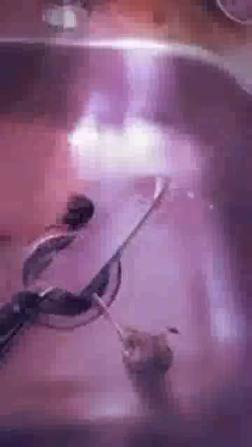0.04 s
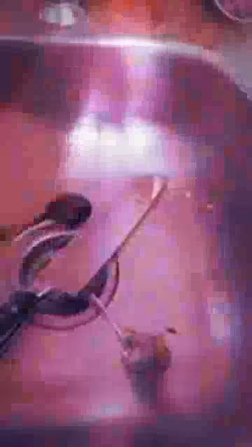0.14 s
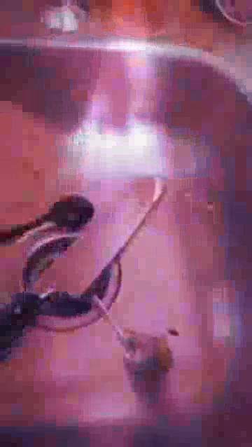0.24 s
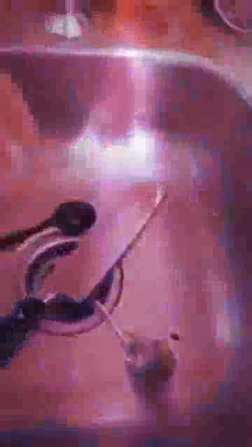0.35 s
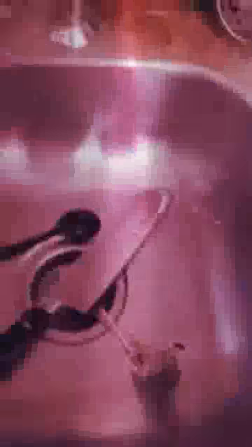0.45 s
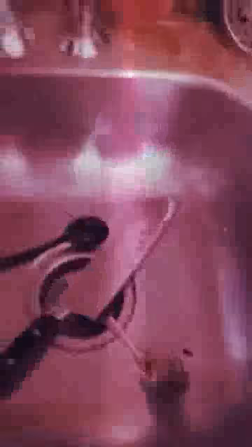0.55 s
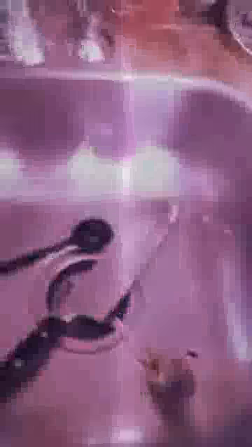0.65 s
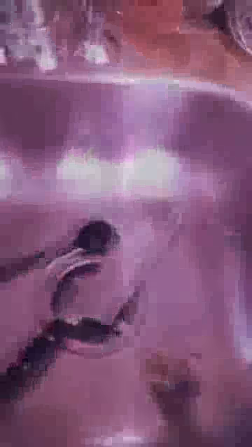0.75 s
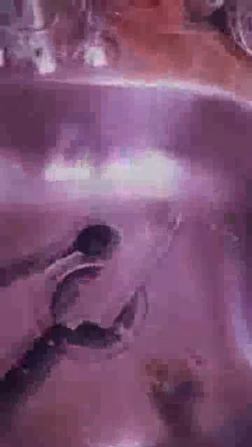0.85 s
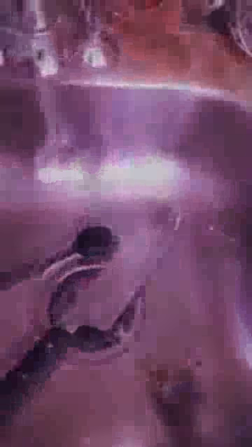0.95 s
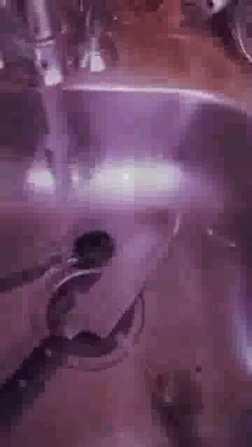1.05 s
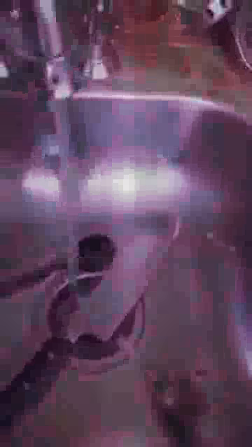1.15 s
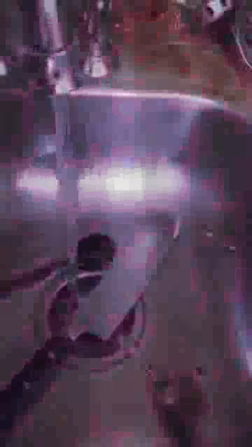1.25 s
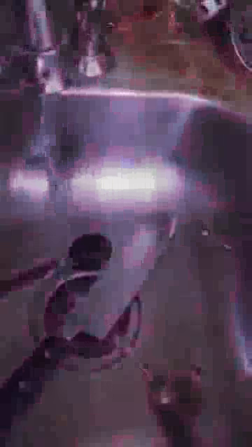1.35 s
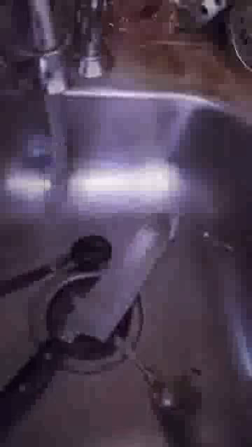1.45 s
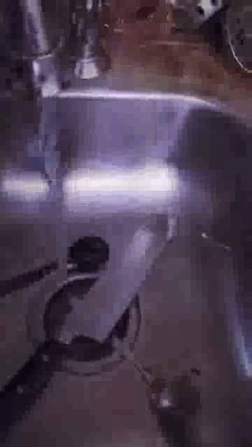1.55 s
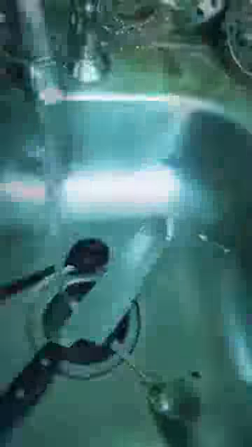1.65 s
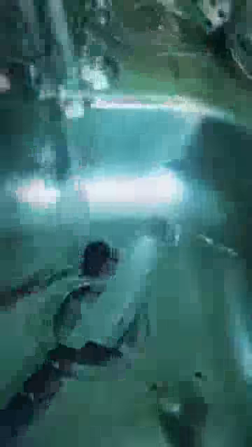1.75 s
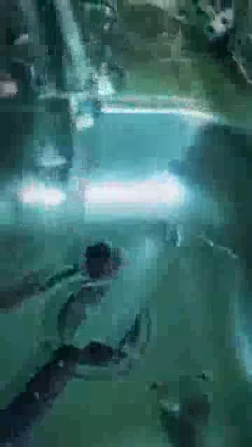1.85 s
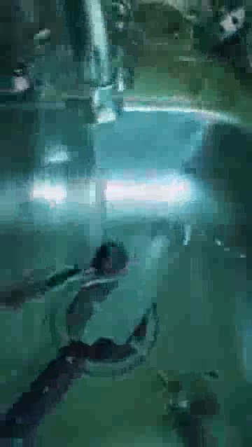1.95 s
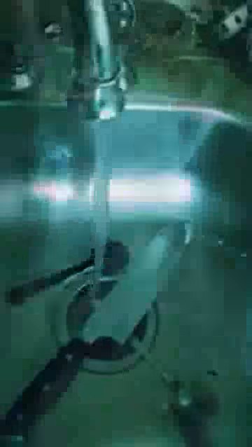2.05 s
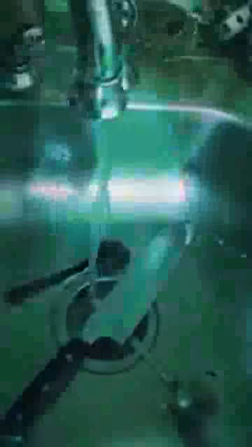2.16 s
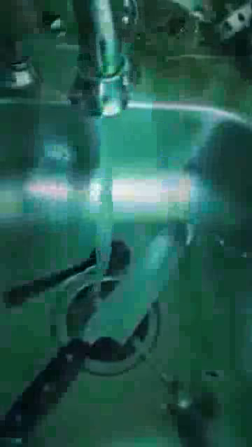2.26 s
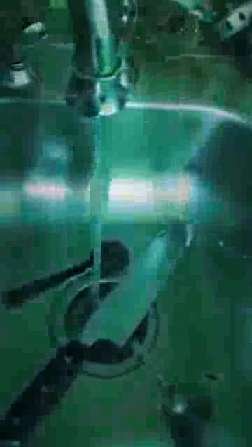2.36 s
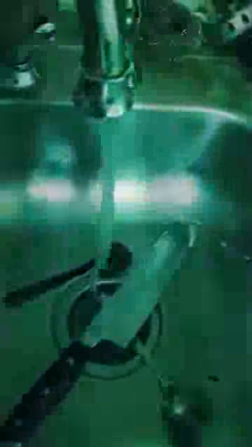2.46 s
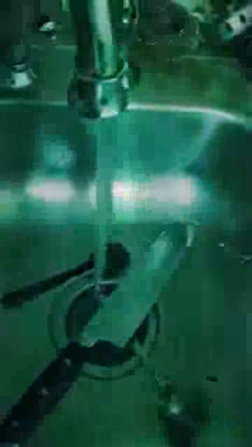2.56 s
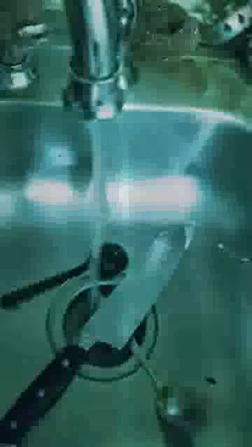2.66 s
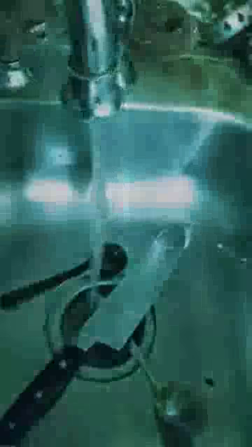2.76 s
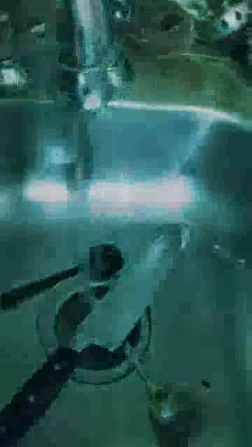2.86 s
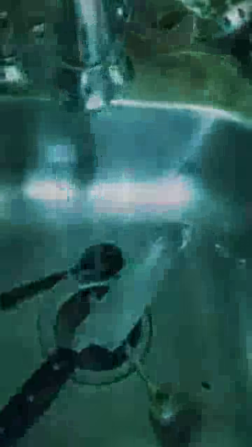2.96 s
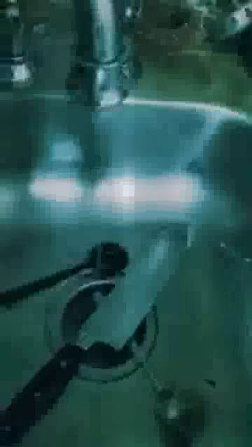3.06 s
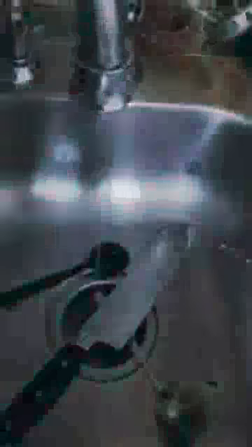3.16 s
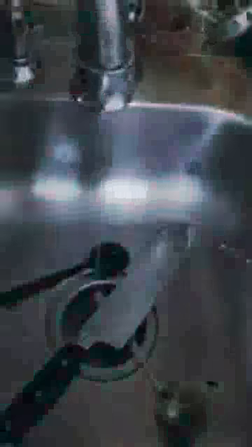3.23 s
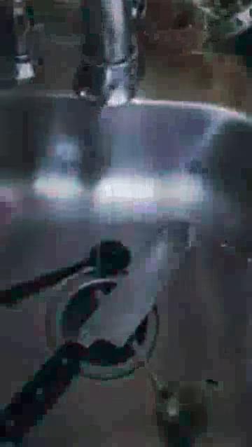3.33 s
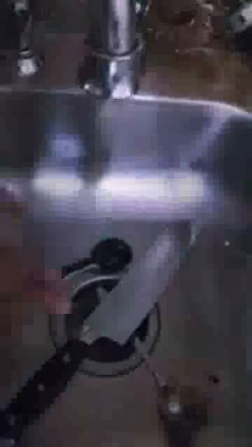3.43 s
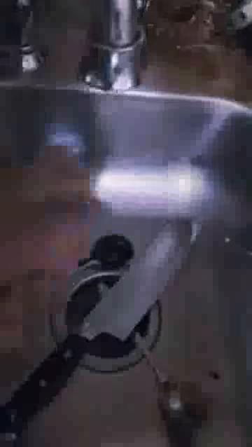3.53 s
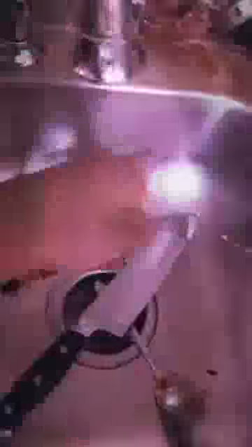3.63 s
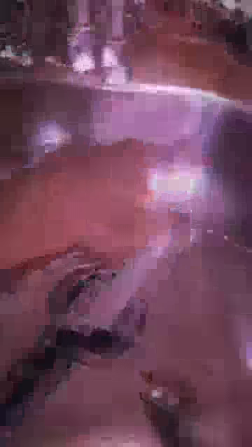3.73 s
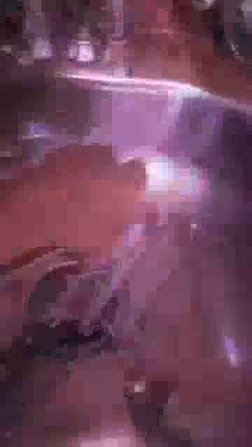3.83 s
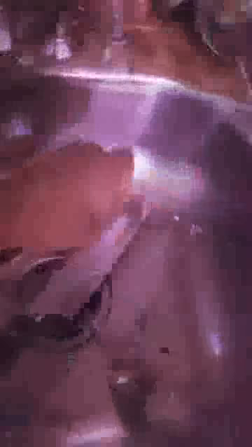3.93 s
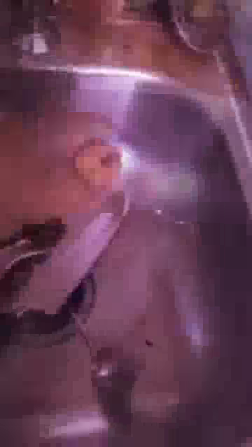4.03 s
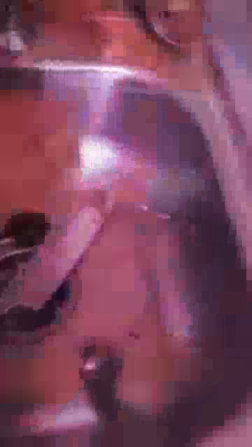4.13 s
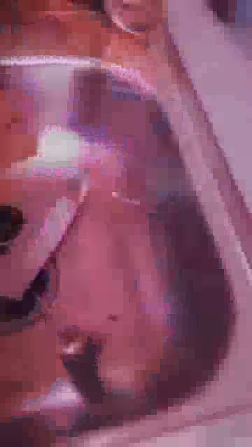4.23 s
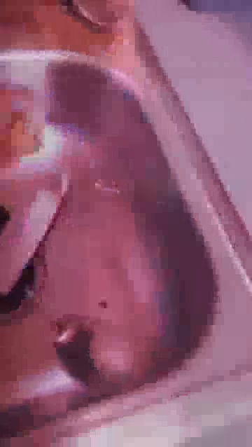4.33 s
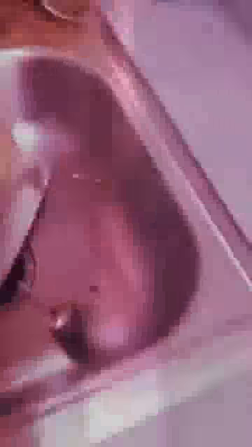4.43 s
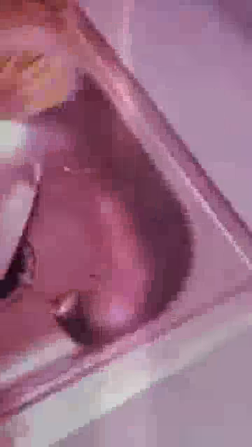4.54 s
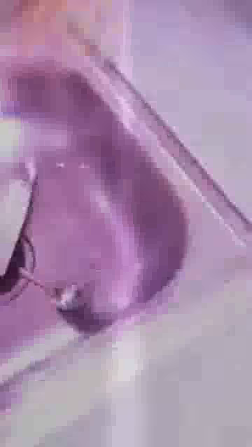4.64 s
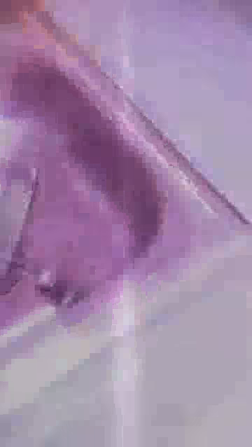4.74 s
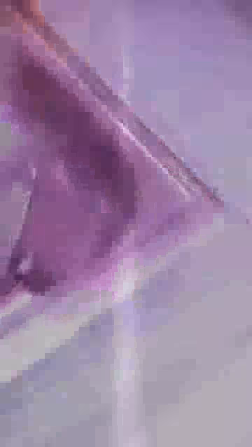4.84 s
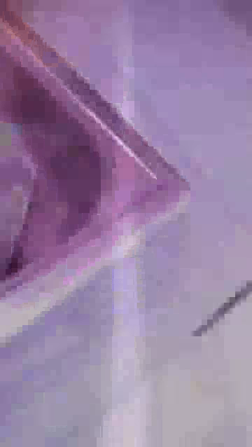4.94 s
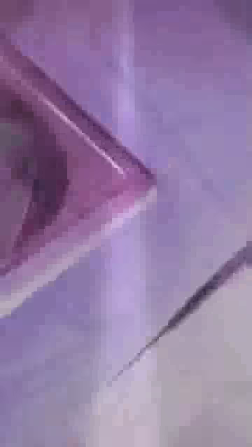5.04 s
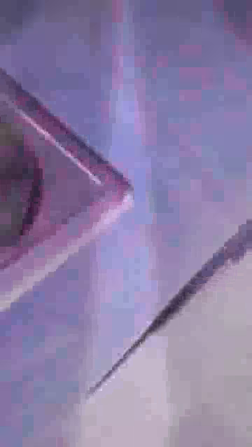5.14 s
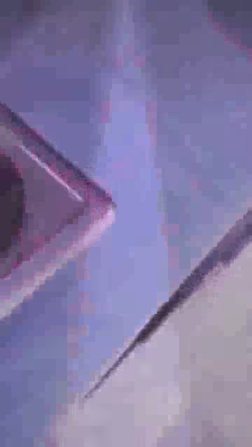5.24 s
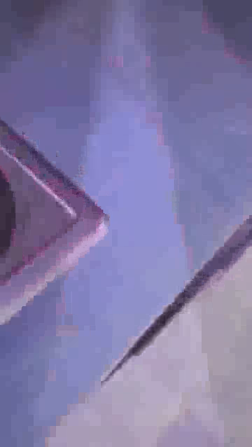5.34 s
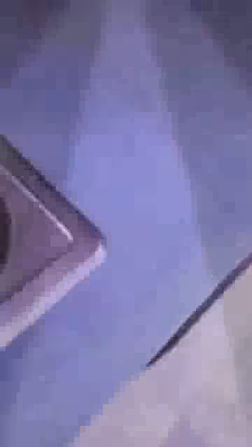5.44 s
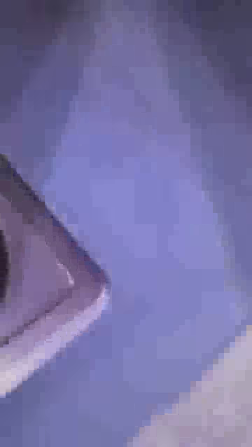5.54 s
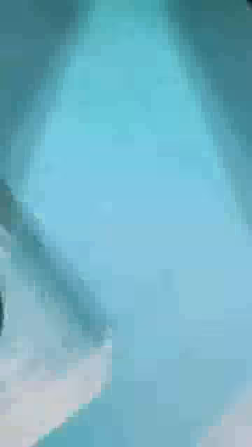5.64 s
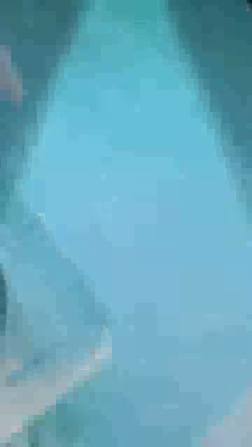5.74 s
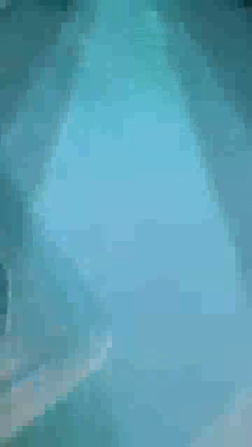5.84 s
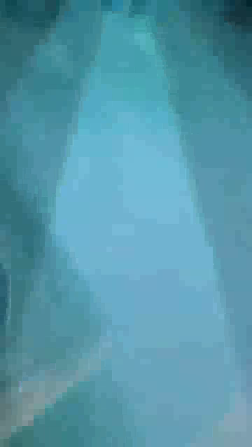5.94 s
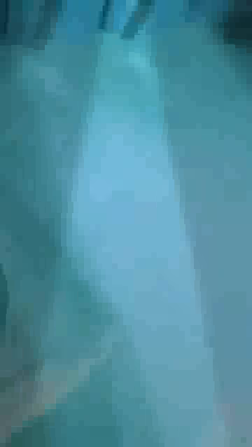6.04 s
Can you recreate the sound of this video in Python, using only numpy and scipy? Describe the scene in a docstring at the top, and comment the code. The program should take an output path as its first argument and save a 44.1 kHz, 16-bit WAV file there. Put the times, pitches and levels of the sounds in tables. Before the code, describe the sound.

A kitchen tap spits open, its stream hisses and drums on a steel sink, hits utensils, shuts off with a knock, drips, then cloth rustles.

```python
"""A kitchen with a stainless steel sink: a tap is opened, spits, and its stream hisses and drums on the basin.
The jet is showers of tiny noise impacts and ringing bubbles; it splatters more as the spout swings over utensils.
It is shut off and the last slugs and drips fall, as noise bursts and damped tones. Knocks and ticks are short noise
bursts, the knocks with ringing modes. Shaped noise makes swishes of clothing and floor rumble as the person steps
away; soft bumps are low damped tones. Sink and room add diffuse echoes."""
import sys
import numpy as np
from scipy import signal
from scipy.fft import rfft, irfft, next_fast_len
from scipy.io import wavfile
from scipy.ndimage import map_coordinates

SR = 44100
rng = np.random.default_rng(int(sys.argv[2]) if len(sys.argv) > 2 else 0)


def wrap_up_sound(samples):
    """Save the sound to the file named by the first command line argument, as 16-bit audio."""
    columns = np.atleast_2d(samples).T
    # keep every value between -1 and 1, then stretch to whole-number steps
    tamed = np.clip(columns, -1, 1)
    steps = np.round(tamed * 32767).astype(np.int16)
    wavfile.write(sys.argv[1], SR, steps)


N = 268569


def amp(db):
    """Decibels to gain."""
    return 10 ** (np.asarray(db) / 20)


def unit(x):
    """Scale to rms 1."""
    return x / np.sqrt(np.mean(x ** 2) + 1e-20)


def peaked(x):
    """Scale to peak 1."""
    return x / np.abs(x).max()


def along(points, hz):
    """Read (Hz, value) points on a log frequency axis."""
    f, v = np.transpose(points)
    return np.interp(np.log(hz + 1), np.log(f + 1), v)


def curve(rows):
    """Join (s, value) rows by straight lines, one value per sample."""
    return np.interp(np.arange(N) / SR, *np.transpose(rows))


def wobble(rate):
    """A smooth random curve with this many knots a second."""
    return map_coordinates(rng.standard_normal(4096), [np.arange(N) * rate / SR], mode="wrap")


def envelope(start, rise, hold, fall_db_per_s):
    """A rounded attack, a hold and an even fall in dB."""
    t = np.arange(N) / SR - start
    attack = np.sin(np.pi / 2 * np.clip(t / rise, 0, 1))
    return attack * amp(-fall_db_per_s * np.maximum(t - rise - hold, 0))


def filtered(x, response):
    """Multiply the spectrum of x by a response of frequency."""
    n = x.shape[-1]
    m = next_fast_len(n + 8192)
    return irfft(rfft(x, m) * response(np.fft.rfftfreq(m, 1 / SR)), m)[..., :n]


def resonance(f, hz, q):
    """A causal band-pass of gain 1 at hz."""
    return 1j * f * hz / q / (hz * hz - f * f + 1j * f * hz / q)


def add(track, s, sound):
    """Mix a sound into the track at s seconds."""
    part = track[:, round(s * SR):][:, :sound.shape[-1]]
    part += sound[..., :part.shape[1]]


# how alike the two ears hear each band: (f/Hz, left-right likeness)
EAR_LIKENESS = [(25, .92), (60, .96), (110, .995), (200, .995), (350, .93), (550, .65), (700, .3),
                (1000, .5), (1300, 0), (16000, -.05)]


def ears(pair):
    """Blend two unrelated signals so that left and right share the bass and part in the treble."""
    turn = lambda hz: np.arccos(np.clip(along(EAR_LIKENESS, hz), -1, 1)) / 2
    mid, side = filtered(pair, lambda hz: np.array([np.cos(turn(hz)), np.sin(turn(hz))]))
    return np.array([mid + side, mid - side])


def coloured(pair, spectrum):
    """Shape two unrelated signals by a spectrum into left and right; rms 1."""
    return unit(ears(filtered(pair, lambda hz: amp(along(spectrum, hz)))))


def leaning(pair, lean):
    """Tilt a pair to the left or right, by frequency."""
    return filtered(pair, lambda hz: amp(np.array([along(lean, hz), -along(lean, hz)]) / 2))


def impacts(spread_db, size=N):
    """Dense tiny impacts whose sizes scatter by spread_db; rms 1."""
    return unit(rng.standard_normal((2, size)) * amp(spread_db * rng.standard_normal(size)))


def echoes(x, t60s, size, count=24):
    """A diffuse noise tail per ear, each frequency dying at its own speed; fresh tails crossfade in turn."""
    out, hop = np.zeros((2, N)), N // count + 1
    padded = np.pad(x, ((0, 0), (hop, 2 * hop)))
    fade = np.hanning(2 * hop)
    for start in range(0, N + hop, hop):
        hz, t, z = signal.stft(rng.standard_normal((2, size)), SR, nperseg=256)
        decay = amp(-60 * t / along(t60s, hz)[:, None])
        tail = signal.istft(z * decay, SR, nperseg=256)[1]
        piece = fade * padded[:, start:start + 2 * hop]
        answer = signal.fftconvolve(piece, tail / np.linalg.norm(tail[0]), axes=1)
        add(out, max(start - hop, 0) / SR, answer[:, max(hop - start, 0):])
    return ears(out)


# colour of the room's steady background: (f/Hz, level/dB)
ROOM_COLOUR = [(25, -24), (60, 1), (100, -1), (150, -20), (260, -18), (400, -10), (700, -12.5), (1200, -27),
               (2000, -24), (2400, -22), (3000, -24), (5000, -30), (16000, -33.5)]


def room_tone():
    """A faint noise floor whose level wavers slightly."""
    level_db = -63.5 + .5 * wobble(26.0)
    return amp(level_db) * coloured(rng.standard_normal((2, N)), ROOM_COLOUR)


# shifts of weight: (t/s, level/dB)
WEIGHT_SHIFTS = [(4.14, -58), (4.37, -53), (4.46, -65), (4.62, -65), (4.96, -54), (5.51, -61), (5.92, -45),
                 (6.02, -60)]
# rumble of the floor: (f/Hz, level/dB)
FLOOR_RUMBLE = [(25, -8), (65, 25.5), (100, -3), (160, 4), (400, -37)]


def steps():
    """Each shift of weight sends a short rumble through the floor."""
    weight = sum(amp(db) * envelope(s, rise=0.03, hold=0.066, fall_db_per_s=102) for s, db in WEIGHT_SHIFTS)
    return weight * coloured(rng.standard_normal((2, N)), FLOOR_RUMBLE)


# soft bumps of pipe, basin floor, hand and feet: (t/s, level/dB, f/Hz, t60/s)
SOFT_BUMPS = [(.085, -51, 600, 0.086), (0.127, -47.5, 148, 0.29), (1.038, -47, 132, 0.03),
              (1.091, -40, 222, 0.021), (1.113, -37.5, 142, 0.081), (1.393, -37, 83, 0.16),
              (1.703, -32.5, 145, 0.23), (1.971, -29.5, 405, 0.096), (2.221, -30, 357, 0.11),
              (2.265, -30.5, 274, 0.17), (2.375, -26, 144.7, 0.32), (2.591, -27.5, 165, 0.11),
              (2.959, -23, 162, 0.06), (3.084, -15, 290, 0.027), (3.13, -18, 352.6, 0.12),
              (3.141, -34, 70.2, 0.45), (3.201, -31.5, 136.2, 0.54), (3.67, -35.5, 179, 0.24),
              (3.884, -41, 191.6, 0.34), (4.285, -45.5, 395, 0.14), (4.966, -44, 70, 0.34),
              (5.389, -49, 207, 0.26), (5.927, -42, 285, 0.041), (5.938, -40, 339, 0.11),
              (5.939, -38.5, 61, 0.14), (5.957, -41.5, 414, 0.095), (5.964, -43.5, 266, 0.073),
              (5.991, -48, 369, 0.19), (6.052, -51, 337, 0.15), (6.06, -35, 62, .5)]


def bumps():
    """Soft low thuds: a damped mode and the scuff of the contact around it."""
    out, t = np.zeros((2, N)), np.arange(SR // 2) / SR
    for s, db, hz, t60 in SOFT_BUMPS:
        fade = amp(-60 * t / t60) * (1 - np.exp(-t / (0.072 * t60)))
        mode = fade * np.sin(2 * np.pi * hz * t)
        scuff = filtered(fade * rng.standard_normal(len(t)), lambda f: resonance(f, hz, q=1.14) ** 2)
        add(out, s, amp(db) * peaked(peaked(mode) + peaked(scuff)))
    return out


# faint rubs with a narrow pitch: (t/s, rise/s, level/dB, f/Hz)
PITCHED_RUBS = [(4.2, 0.16, -65, 2270), (5.03, 0.087, -52, 1390), (5.45, 0.3, -70, 2370)]


def rubs():
    """Something rubs faintly and sings: noise through one narrow band."""
    out = np.zeros((2, N))
    for s, rise, db, hz in PITCHED_RUBS:
        noise = rng.standard_normal((2, N))
        band = unit(ears(filtered(noise, lambda f: resonance(f, hz, q=5.0) ** 2)))
        out += amp(db) * envelope(s, rise, hold=0, fall_db_per_s=130) * band
    return out


# strokes of cloth over cloth: (t/s, rise/s, soft rustle level/dB, crisp swish level/dB)
CLOTH_STROKES = [(0.0, 0.0015, -68, -57), (.03, 0.085, -64, -57), (.2, 0.092, -71.5, -64),
                 (.36, 0.15, -65, -71), (.64, .1, -62, -60.5), (.77, 0.075, -51.5, -53),
                 (4.05, 0.1, -84, -62.5), (4.19, 0.057, -60, -66), (4.33, 0.04, -63.5, -72.5),
                 (4.41, 0.075, -53.5, -55.5), (4.579, 0.043, -54.5, -52), (4.66, 0.054, -59, -62.5),
                 (4.89, 0.088, -52.5, -50), (4.91, 0.26, -49, -46), (5.24, 0.051, -55.5, -55),
                 (5.316, 0.022, -48.5, -40.5), (5.35, 0.037, -48.5, -44.5), (5.489, 0.057, -61.5, -63),
                 (5.703, 0.055, -49.5, -41.5), (5.917, 0.02, -49, -51), (6.02, 0.075, -57.5, -67)]
# soft rustle of the fibres: (f/Hz, level/dB)
RUSTLE_COLOUR = [(150, -8.5), (400, 3.5), (800, 0.5), (1100, 1), (1380, 1.5), (1800, 3), (2400, 4.5),
                 (3200, 2), (5000, -2), (15000, -26)]
# crisp swish on top: (f/Hz, level/dB)
SWISH_COLOUR = [(1000, -15.5), (3000, 5.5), (6000, 4.5), (11000, 4), (16000, 4.5)]


def clothes():
    """Cloth slides over cloth: each stroke is a soft rustle with a crisp swish on top."""
    rustle, swish = np.zeros((2, N))
    for s, rise, rustle_db, swish_db in CLOTH_STROKES:
        speed = envelope(s, rise, hold=0.013, fall_db_per_s=166)
        # overlapping strokes add in power
        rustle = np.hypot(rustle, amp(rustle_db) * speed)
        swish = np.hypot(swish, amp(swish_db) * speed)
    soft = rustle * coloured(impacts(spread_db=2.5), RUSTLE_COLOUR)
    crisp = swish * coloured(impacts(spread_db=2.5), SWISH_COLOUR)
    return soft + crisp


# sharp ticks of tap, utensils, sleeve and shoe heel: (t/s, level/dB, f/Hz, t60/s)
SHARP_TICKS = [(.034, -25, 11850, 0.048), (.215, -46, 6600, 0.048), (0.255, -46, 6300, 0.03),
               (0.318, -42.5, 4660, 0.035), (.631, -40.5, 3730, 0.02), (1.019, -45, 7040, .03),
               (1.092, -37, 8400, 0.05), (2.496, -8, 10000, 0.04), (2.769, -8, 4740, 0.017),
               (3.554, -47, 4100, 0.075), (3.772, -41, 8600, 0.016), (3.858, -39, 3430, 0.051),
               (3.878, -44, 10650, .03), (3.896, -39.5, 8800, 0.027), (4.226, -40, 4860, 0.027),
               (4.234, -40, 11100, 0.036), (4.348, -50, 3140, 0.019), (4.903, -38, 13000, .012),
               (4.903, -45.5, 1700, .012), (5.28, -37, 9200, 0.071), (5.924, -41, 1600, .015),
               (5.926, -37, 3100, 0.01)]


def ticks():
    """A sharp little contact: a crack, then a brief ring of filtered noise."""
    out, t = np.zeros((2, N)), np.arange(4096) / SR
    for s, db, hz, t60 in SHARP_TICKS:
        fade = amp(-60 * t / t60) + amp(-60 * t / 0.0048)
        burst = rng.standard_normal((2, len(t))) * fade
        add(out, s, amp(db) * peaked(filtered(burst, lambda f: resonance(f, hz, q=2.33) ** 2)))
    return out


# knocks on the steel, and one faint bump as a cloth swish starts:
# (t/s, level/dB before the basin, brightness/dB)
KNOCK_BLOWS = [(.356, -48, -3), (0.378, -45, -4), (0.397, -45, 2), (3.124, -5.5, 7), (3.159, -21, 36),
               (4.286, -38, -19), (4.903, -45, -21)]
# bright modes of a knock: (f/Hz, relative level/dB, t60/s before the cap in knocks)
STEEL_MODES = [(1890, 4, 0.093), (2330, -24, 0.056), (2470, 5.5, 0.08), (3262, -38.5, 0.22),
               (4140, -16, 0.052), (4700, -7, 0.04), (6060, -4, 0.02), (6840, -38, 0.0486)]
# hollow plop, in knocks and splats: (f/Hz, level/dB)
PLOP_COLOUR = [(60, -34.5), (180, 2.5), (300, -5.5), (470, 2.5), (600, 4.5), (750, 0.5), (1050, 1.5),
               (1400, -13.5), (3000, -34)]


def knocks():
    """A short hollow thump; its brightness sets how much crack and ringing steel comes with it."""
    out, t = np.zeros((2, N)), np.arange(12000) / SR
    crack_colour = [(900, -38), (2200, 8.0), (4600, -1.5), (16000, -18.0)]  # f/Hz, level/dB
    for s, db, bright_db in KNOCK_BLOWS:
        body = coloured(rng.standard_normal((2, len(t))) * amp(-60 * t / 0.032), PLOP_COLOUR)
        ring = np.zeros((2, len(t)))
        for hz, level_db, t60 in STEEL_MODES:
            fade = amp(level_db - 60 * t / min(t60, .05))  # no mode outlasts a t60 of 50 ms
            ring += fade * np.sin(2 * np.pi * (hz * t + rng.random((2, 1))))
        crack = coloured(rng.standard_normal((2, len(t))) * amp(-60 * t / 0.016), crack_colour)
        bright = .7 * peaked(ring) + peaked(crack)
        add(out, s, amp(db) * peaked(peaked(body) + amp(bright_db) * bright))
    return out


# ringing drops, bubbles and clinks: (t/s, level/dB before trim, f/Hz, t60/s)
DROPS_AND_CLINKS = [(0.032, -29.5, 6300, 0.018), (.213, -44, 3080, .025), (.242, -49, 3000, .025),
                    (.243, -50, 1740, 0.043), (.291, -48, 2970, 0.039), (0.294, -52, 1700, .035),
                    (0.318, -41, 4800, .028), (.321, -55, 2960, 0.038), (0.351, -41.5, 1780, .03),
                    (.355, -37, 1570, 0.03), (.355, -44, 990, 0.034), (.365, -49, 755, 0.099),
                    (0.378, -40, 1010, 0.043), (0.38, -58, 1530, .05), (.386, -49, 450, 0.11),
                    (0.397, -39.5, 1200, 0.037), (.402, -47, 800, 0.045), (.449, -46, 1920, 0.03),
                    (.476, -53, 2980, .03), (.356, -52, 3030, .05), (.401, -52, 3000, .035),
                    (.607, -52, 3030, .02), (.631, -37, 2980, 0.016), (.631, -41, 3640, .016),
                    (1.642, -19.5, 1154, 0.061), (1.656, -22, 1073, 0.074), (1.667, -23, 880, 0.034),
                    (1.964, -15.5, 943, 0.032), (1.966, -24, 2140, 0.016), (1.974, -21, 3180, 0.023),
                    (2.198, -21.5, 904, 0.032), (2.226, -23.5, 941, 0.078), (2.425, -20.5, 950, 0.057),
                    (2.466, -25, 1090, 0.061), (2.538, -24.5, 1023, 0.086), (2.645, -26, 1072, 0.064),
                    (2.69, -18.5, 1860, 0.03), (2.888, -16.5, 3130, 0.043), (2.926, -28, 3150, 0.044),
                    (3.036, -21.5, 1096, 0.18), (3.038, -21, 613, 0.076), (3.124, -10, 2197, 0.043),
                    (3.132, -14.5, 2530, 0.066), (3.158, -13, 2740, 0.033), (3.176, -17.5, 2310, 0.04),
                    (3.195, -18, 2180, 0.033), (3.312, -18, 537, 0.043), (3.414, -24.5, 540, 0.055),
                    (3.476, -32, 2840, 0.026), (3.518, -35.5, 2760, 0.025), (3.553, -19, 3400, 0.019),
                    (3.579, -21.5, 1910, 0.039), (3.588, -24, 824, 0.045), (3.586, -19, 562, 0.076),
                    (3.618, -27, 2240, 0.03), (3.643, -23, 488, 0.033), (3.652, -29, 1000, .03),
                    (3.686, -29, 2010, 0.029), (3.695, -26.5, 836, 0.065), (3.698, -34, 2260, 0.072),
                    (3.709, -35, 646, 0.026), (3.771, -39, 2240, 0.035), (3.788, -34, 2960, 0.03),
                    (3.814, -23.5, 540, 0.05), (3.83, -28, 427, 0.069), (3.807, -38, 1990, 0.028),
                    (3.878, -32, 560, 0.031), (3.976, -32, 600, .04), (3.523, -32, 584, .025),
                    (3.539, -40, 794, .025), (3.6, -27, 746, .035), (3.628, -34.5, 1050, .03),
                    (3.752, -42, 810, 0.025), (3.856, -38, 2920, 0.036), (3.862, -40, 3510, 0.029),
                    (3.897, -38, 2380, .025), (3.921, -37, 969, 0.078), (4.284, -30, 1000, 0.041),
                    (4.286, -39, 630, .04), (4.68, -43, 566, 0.026), (4.372, -54, 420, .08),
                    (4.412, -52, 2240, .05), (4.349, -46, 3170, 0.028), (4.349, -44.5, 960, .035),
                    (4.351, -39, 2250, 0.068)]


def plinks():
    """A damped tone, roughened by the contact that starts it; its phase differs between the ears."""
    out, t = np.zeros((2, N)), np.arange(8192) / SR
    for s, db, hz, t60 in DROPS_AND_CLINKS:
        lag_s = .00005 * rng.standard_normal((2, 1))
        fade = amp(-60 * t / t60) * (1 - np.exp(-t / 0.0012))
        tone = np.sin(2 * np.pi * hz * (t + lag_s)) * fade
        noise = rng.standard_normal((2, len(t))) * amp(-60 * t / 0.026)
        contact = ears(filtered(noise, lambda f: resonance(f, hz, q=3.4) ** 2))
        add(out, s, amp(db - 3) * (tone + .55 * peaked(contact)))
    return out


# short spits as the valve opens, then a longer rush through the spout: (t/s, hold/s, level/dB)
SPITS_AND_RUSH = [(1.002, 0.013, -60.5), (1.009, 0.014, -56), (1.088, 0.013, -58.5), (1.143, 0.44, -55.5)]
# colour of the spout tube: (f/Hz, level/dB)
SPOUT_COLOUR = [(150, -6.5), (400, 13), (1000, 1.5), (1400, -7), (2100, -7), (2500, 0.5), (2900, -41),
                (6000, -20.5), (16000, -23)]


def squirts():
    """Air and water spit, then rush longer through the spout as the valve opens; the tube colours the noise."""
    push = sum(amp(db) * envelope(s, 0.0037, hold, fall_db_per_s=453) for s, hold, db in SPITS_AND_RUSH)
    return push * coloured(impacts(spread_db=0.5), SPOUT_COLOUR)


# slugs of water and wet slaps, before trims: (t/s, level/dB, plop level/dB, splash level/dB)
WATER_SLUGS = [(1.6427, -23.5, -2, -18), (1.6665, -29, 9, 0), (1.714, -44, 5, -11.5), (1.9277, -26, -1, 1),
               (1.963, -24.5, -2.5, -10), (1.98, -35.5, 17.5, 1), (2.125, -34, 13, -3),
               (2.16, -24.5, -4.5, -8), (2.1998, -25.5, 8, -8), (2.226, -42.5, -1, 5.5),
               (2.4187, -21.5, -12.5, 2), (2.5352, -24.5, -4.5, -12.5), (2.5988, -25, -11.5, 6.5),
               (2.835, -29.5, -8.5, 13), (2.9312, -34.5, 3.5, 17.5), (3.0339, -35.5, 21, -19),
               (3.0774, -29, 10.5, -9.5), (3.1561, -10.5, -2.5, -16.5), (3.195, -17, 0, -2),
               (3.2883, -35.5, 1, 15), (3.3119, -29.5, -3.5, -11.5), (3.372, -18.5, -2, -6),
               (3.4071, -25, 5.5, -1), (3.52, -42, 8, 1.5), (3.535, -46.5, 20, -16), (3.583, -24, 4, -15.5),
               (3.596, -27.5, 10.5, -8.5), (3.618, -45.5, -23, -6.5), (3.645, -48.5, 24, -0.5),
               (3.686, -34, 10, -21.5), (3.696, -27, 7, -24), (3.708, -33, 2, -10.5),
               (3.732, -47.5, 10, -6), (3.768, -31, 3.5, -5.5), (3.785, -42, 1, -7.5),
               (3.811, -39.5, 20, -7.5), (3.839, -48, 9.5, -4), (3.877, -40.5, 14, -1), (3.897, -34, 2, -5),
               (3.9184, -50, 19.5, -34), (3.974, -44.5, 10.5, -5)]
# water slapping the utensils: (f/Hz, level/dB)
CLACK_COLOUR = [(900, -31.5), (1400, -20), (1950, 6), (2500, -1), (3000, -4), (4500, -10), (16000, -56)]
# splash of droplets: (f/Hz, level/dB)
SPLASH_COLOUR = [(1800, -12), (2700, 2.5), (3300, 3.5), (4500, 2.5), (6000, 0.5), (8000, -5.5),
                 (16000, -32)]
# fine hiss, in splats and the stream: (f/Hz, level/dB)
SPRAY_COLOUR = [(500, -32.5), (1500, -3), (2600, -9.5), (4200, -10.5), (6200, -3), (7600, -6.5), (9300, -2),
                (12500, -5), (16000, -4)]


def splats():
    """Each slug of water lands as a short burst of droplets: a clack, a plop on the steel, a splash and fizz."""
    out, t = np.zeros((2, N)), np.arange(8192) / SR
    rise_s, length_s = 0.00098, 0.014
    swell = (1 - np.exp(-t / rise_s)) * np.exp(-(t / length_s) ** 1.11)
    burst = lambda spectrum: coloured(swell * impacts(spread_db=6.5, size=len(t)), spectrum)
    for s, db, plop_db, splash_db in WATER_SLUGS:
        droplets = burst(SPLASH_COLOUR) + amp(-4) * burst(SPRAY_COLOUR)
        plop = amp(plop_db - 3.0) * burst(PLOP_COLOUR)
        splash = amp(splash_db + 1.5) * droplets
        add(out, s, amp(db - 24.5) * (burst(CLACK_COLOUR) + plop + splash))
    return out


# the two low bands under the water: (t/s, boom level/dB, drumming level/dB)
LOW_BANDS = [(1.0, -75, -71), (1.04, -50, -59), (1.33, -56.5, -53), (1.42, -48, -42), (1.56, -45.5, -40.5),
             (1.78, -45.5, -45.5), (1.89, -44, -56), (1.99, -50.5, -41.5), (2.1, -40.5, -50.5),
             (2.2, -48.5, -34.5), (2.33, -48.5, -43), (2.42, -49.5, -43.5), (2.92, -47.5, -39),
             (3.1, -39, -38.5), (3.28, -47.5, -41.5), (3.48, -61, -62.5), (3.63, -53, -47),
             (3.92, -54.5, -56), (4.058, -72, -65)]
# the whole basin flexing under the stream: (f/Hz, level/dB)
BOOM_COLOUR = [(25, -12.5), (45, -3.5), (60, 0), (80, 1.5), (105, -1), (135, -20.5), (300, -48)]
# the basin floor drumming: (f/Hz, level/dB)
DRUM_COLOUR = [(90, -21.5), (125, -8.5), (148, -0.5), (185, 6.5), (225, -3.5), (300, -22.5), (600, -29.5)]
# the jet roaring on bare steel: (t/s, hold/s, level/dB)
BARE_STEEL_ROARS = [(1.201, 0.25, -40.5), (1.693, 0.11, -45), (2.003, 0.014, -41)]
# colour of that roar: (f/Hz, level/dB)
ROAR_COLOUR = [(150, -30), (230, -6), (285, -1), (360, -3.5), (440, -1.5), (520, -25), (640, -30),
               (760, -7), (860, -30.5), (990, -7.5), (1200, -22.5), (3000, -40)]


def drumming():
    """The basin booms and drums under the water, and roars where the jet meets bare steel."""
    boom_db = curve([(s, db) for s, db, _ in LOW_BANDS])
    drum_db = curve([(s, db) for s, _, db in LOW_BANDS])
    t = np.arange(N) / SR
    wet = (t > LOW_BANDS[0][0]) & (t < LOW_BANDS[-1][0])
    boom = amp(boom_db) * coloured(impacts(spread_db=4.0), BOOM_COLOUR)
    drum = amp(drum_db) * coloured(impacts(spread_db=2.0) * amp(1.8 * wobble(45)), DRUM_COLOUR)
    roar = sum(amp(db) * envelope(s, 0.033, hold, fall_db_per_s=199) for s, hold, db in BARE_STEEL_ROARS)
    return wet * (boom + drum) + roar * coloured(impacts(spread_db=0.5), ROAR_COLOUR)


def bubble(t, hz, cycles):
    """An air pocket in the film of water rings for a few cycles."""
    age = t * hz / cycles
    return np.sin(2 * np.pi * hz * t) * np.exp(-age) * (1 - np.exp(-8 * age))


def froth(centre_hz, octaves, cycles, spread_db, count, size):
    """Many bubbles in the film of water, scattered in time, pitch, strength and place; rms 1."""
    start, t = rng.integers(0, N, (count, 1)), np.arange(size)
    pitch, strength, side = rng.standard_normal((3, count, 1))
    hz = np.minimum(centre_hz * 2 ** (octaves * pitch), SR / 3)
    grains = amp(spread_db * np.clip(strength, -2, 2)) * bubble(t / SR, hz, cycles)
    when = (start + t).ravel()
    pair = [np.bincount(when, (grains * np.cos(2 * side + turn)).ravel(), N)[:N] for turn in (0, np.pi / 2)]
    return unit(ears(np.array(pair)))


# strength of the aerated jet: (t/s, flow level/dB)
JET_FLOW = [(1.12, -29), (1.15, -10), (1.2, -1.5), (1.42, 0.5), (1.58, 2), (1.88, 0.5), (2.06, -1.5),
            (2.2, 3), (2.33, -5.5), (2.39, 5.5), (2.5, 0.5), (2.6, 5.5), (2.73, 0.5), (2.92, 3),
            (3.23, 0.5), (3.34, -11), (3.42, -27.5), (3.47, -33), (3.6, -31)]
# where the jet lands: (t/s, aim from 0 = bare steel to 1 = on the utensils by the drain)
JET_AIM = [(1.2, 0.099), (1.5, 0.42), (2.1, 0.43), (2.42, 0.73), (2.75, 0.84), (3.05, 1), (3.4, 0.97)]


def jet(base_db, db_per_flow_db, aim_db):
    """The gain of one voice of the jet, set by the flow and by where it lands."""
    t = np.arange(N) / SR
    running = (t > JET_FLOW[0][0]) & (t < JET_FLOW[-1][0])
    return running * amp(base_db + db_per_flow_db * curve(JET_FLOW) + aim_db * curve(JET_AIM))


# a limp rope of water before and after the jet: (t/s, length/s, level/dB before trim)
LIMP_DRIBBLES = [(1.027, 0.095, -15), (3.3, 0.48, -8), (3.588, 0.37, -7)]
# water pattering on the stiff steel: (f/Hz, level/dB)
PATTER_COLOUR = [(150, -16), (230, -4.5), (290, 1.5), (400, -0.5), (480, -7), (620, -6.5), (750, -13.5),
                 (1050, -6), (1350, -25), (2000, -22.5), (2450, -4.5), (2900, -35), (6000, -34)]
# water breaking up on the utensils: (f/Hz, level/dB)
SPLATTER_COLOUR = [(300, -11), (600, -2.5), (1080, 4), (1350, -3), (1700, -6), (2200, -10), (3000, 1.5),
                   (5000, 2), (7500, -11.5), (16000, -29.5)]


def stream():
    """The water patters on the basin, breaks up on the utensils and throws a fine spray that grows with the flow."""
    dribble, rise = np.zeros(N), 0.02
    for s, length, db in LIMP_DRIBBLES:
        dribble += amp(db - 60.5) * envelope(s, rise, length - rise, fall_db_per_s=254)
    patter = jet(base_db=-48, db_per_flow_db=0.65, aim_db=10) + dribble
    splatter = jet(base_db=-49.5, db_per_flow_db=0.76, aim_db=13.1) + dribble
    spray = jet(base_db=-34.5, db_per_flow_db=1, aim_db=-0.9)

    # a weak flow falls apart into separate drops
    trickle = np.clip(1 - amp(curve(JET_FLOW)), 0, 1)
    depth_db = 1.4 + 2.4 * trickle
    flutter = unit(wobble(90) + wobble(260))
    beads = amp(depth_db * flutter - depth_db ** 2 * np.log(10) / 20)  # about keeps the mean power

    steel = coloured(impacts(spread_db=4.0) * amp(1.5 * wobble(70)), PATTER_COLOUR)
    mid = coloured(impacts(spread_db=5.0) * amp(0.5 * wobble(350)), SPLATTER_COLOUR)
    high = coloured(impacts(spread_db=3.5) * amp(.7 * wobble(500)), SPRAY_COLOUR)
    gurgle = froth(centre_hz=820, octaves=.35, cycles=8, spread_db=3, count=500, size=2400)
    bubbles = froth(centre_hz=2700, octaves=.42, cycles=11, spread_db=3, count=2400, size=1100)
    fizz = froth(centre_hz=10000, octaves=.4, cycles=38, spread_db=2.5, count=4000, size=500)

    pooled = .45 + .7 * curve(JET_AIM)  # bubbles form where water pools by the drain
    wet = .85 * beads * mid + pooled * (.5 * gurgle + .9 * bubbles)
    mist = beads * (high + .45 * fizz) * amp(.8 * wobble(70))
    lumps = np.tanh(wobble(65))  # the water arrives in small uneven lumps
    body = amp(2.2 * lumps) * (patter * steel + splatter * wet)
    return body + spray * amp(.7 * lumps) * mist


# resonances of the steel basin: (f/Hz, width/Hz, lift/dB)
BASIN_MODES = [(137.6, 8.9, 10.5), (268, 15, 2.5), (367.8, 12, 7.5), (409, 3.9, 10), (600, 27, 4.5),
               (670, 12, 0), (870, 11, 4), (1076, 10, 5.5), (1980, 50, -4), (2070, 18, -8), (2300, 14, -4),
               (2346, 28, -12), (3100, 9.7, -2), (2807, 76, 4)]


def basin(x):
    """The steel basin lifts and prolongs, or dulls, whatever meets its resonances."""
    def response(f):
        gain = 1
        for hz, width, lift_db in BASIN_MODES:
            gain = gain + (amp(lift_db) - 1) * resonance(f, hz, q=hz / width)
        return gain
    return filtered(x, response)


# decay of the kitchen: (f/Hz, t60/s)
KITCHEN_DECAY = [(150, 0.11), (1000, 0.3), (4000, 0.34), (14000, 0.047)]
# stereo tilt of the sink: (f/Hz, left minus right level/dB)
SINK_TILT = [(160, 0), (740, -2.5), (1200, 5), (2000, -4), (3300, 2), (5500, 1.5), (9000, 0), (15000, 3.5)]
# stereo tilt of the clothing: (f/Hz, left minus right level/dB)
CLOTH_TILT = [(200, -9), (1500, -2.5), (5000, 1), (15000, -0.5)]


def scene():
    """The water, knocks, plinks and ticks echo briefly in the basin, then in the kitchen; the rest stays dry."""
    through_basin = basin(stream() + drumming() + splats() + knocks())
    sink = through_basin + plinks() + ticks() + squirts()
    wall_decay = [(200, 0.016), (2000, 0.063), (10000, 0.049)]  # f/Hz, t60/s
    walls = filtered(echoes(sink, wall_decay, size=6144), lambda hz: hz / (hz + 400))  # thins the bass
    sink = sink + amp(-5.0) * walls
    room = amp(-8.0) * echoes(sink, KITCHEN_DECAY, size=20000)
    dry_sounds = leaning(clothes(), CLOTH_TILT) + rubs() + bumps() + steps()
    return leaning(sink + room, SINK_TILT) + dry_sounds + room_tone()


def record(dry):
    """Keep nothing above the band limit."""
    top_hz = 15900
    return filtered(dry, lambda hz: hz < top_hz)


dry = scene()
out = record(dry)
wrap_up_sound(out)
```